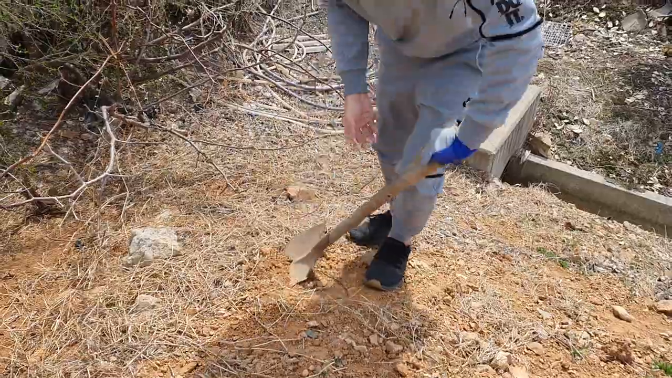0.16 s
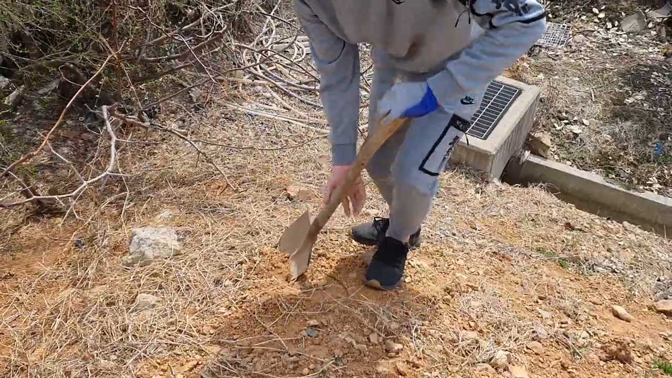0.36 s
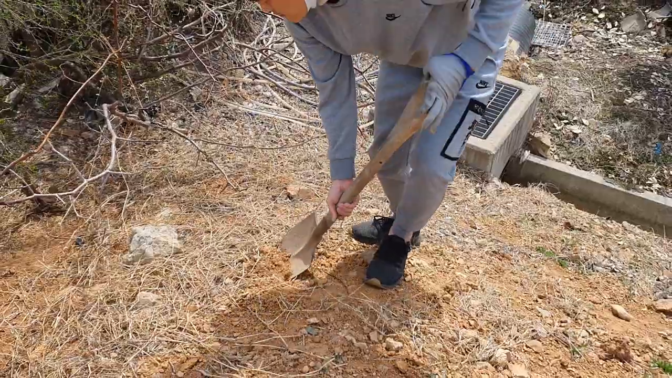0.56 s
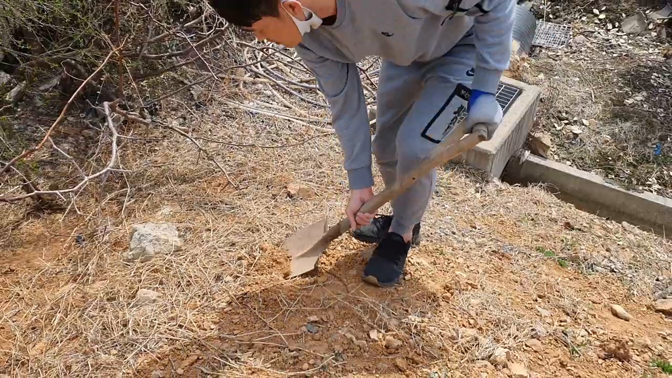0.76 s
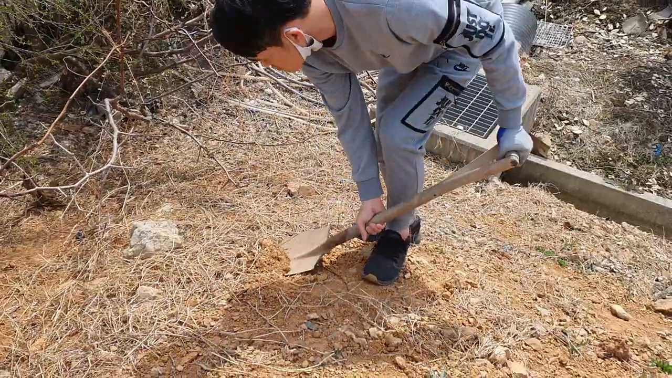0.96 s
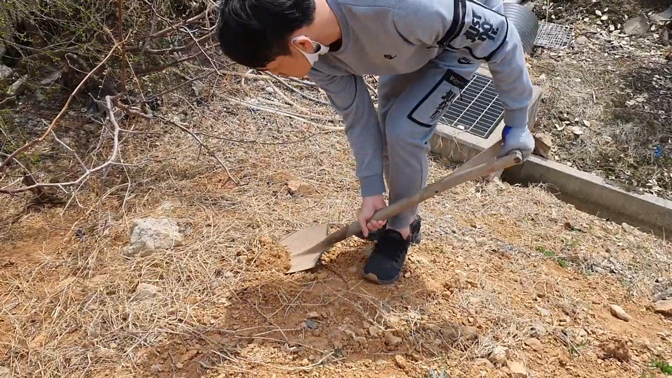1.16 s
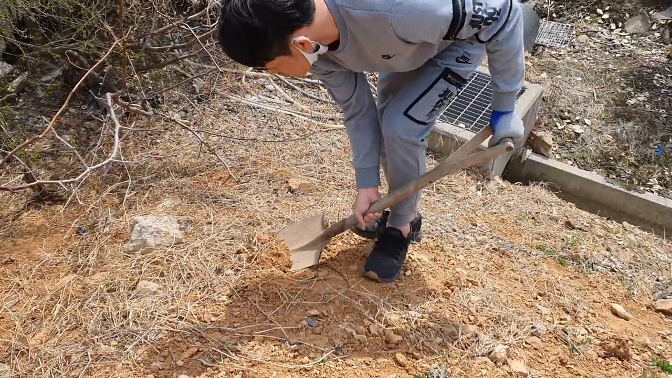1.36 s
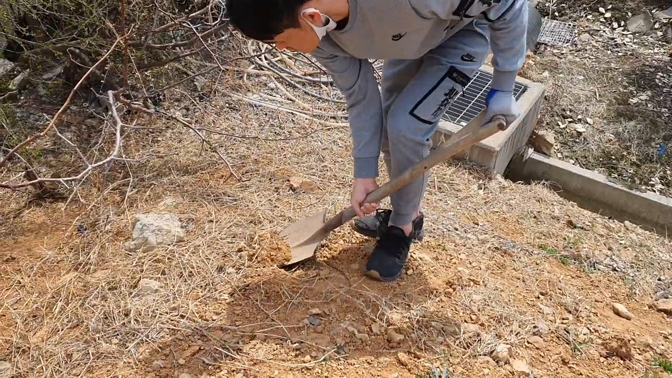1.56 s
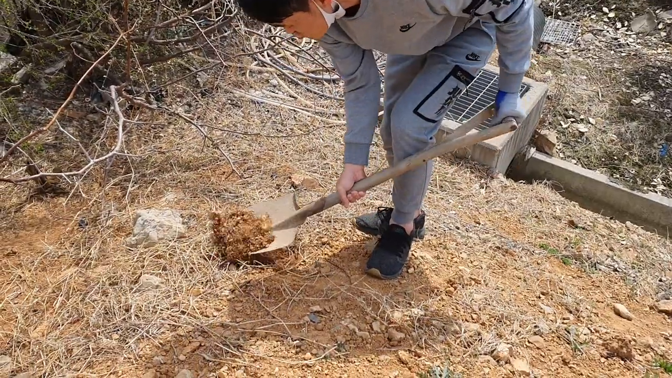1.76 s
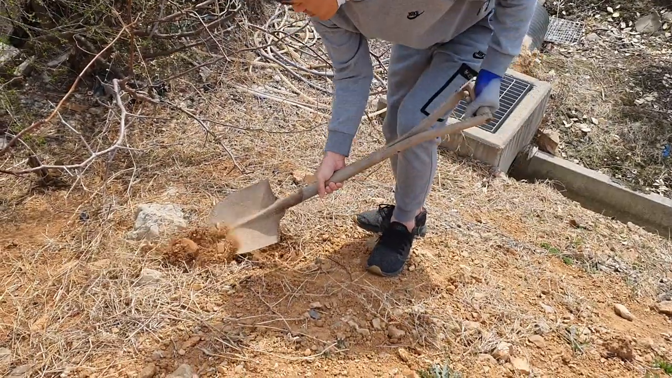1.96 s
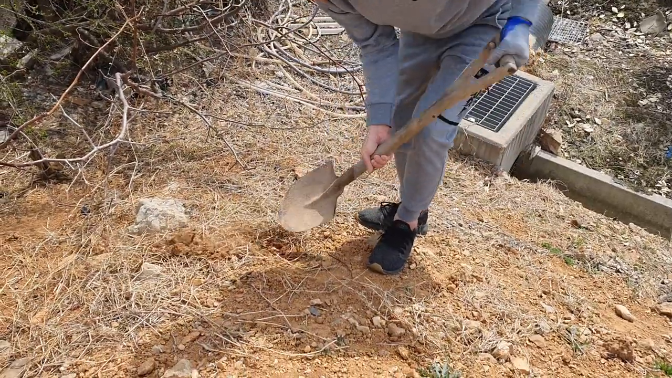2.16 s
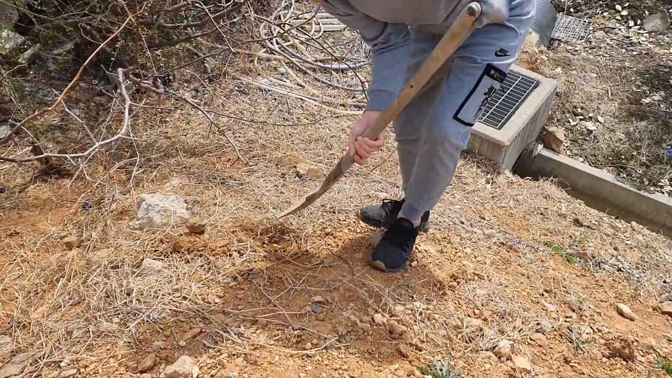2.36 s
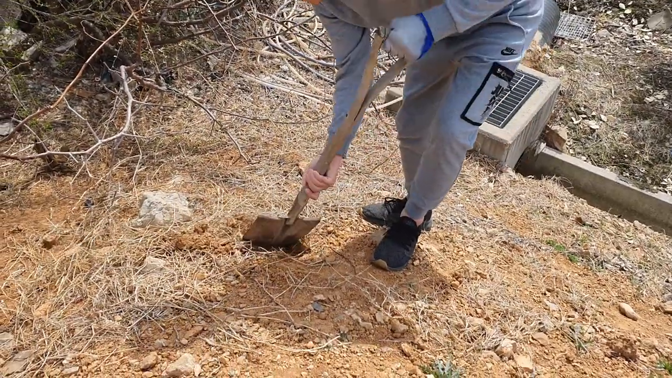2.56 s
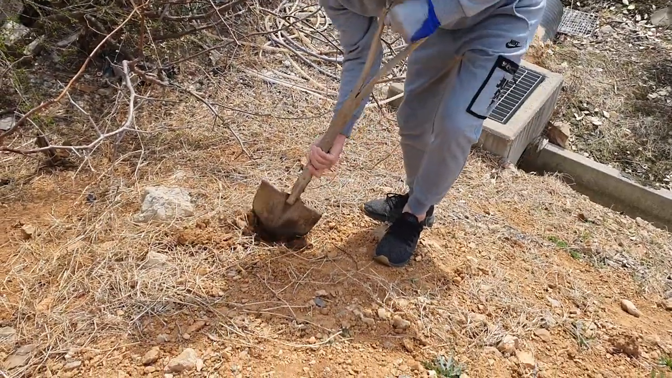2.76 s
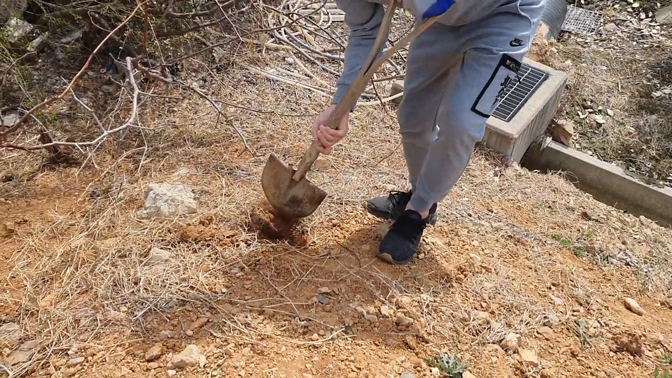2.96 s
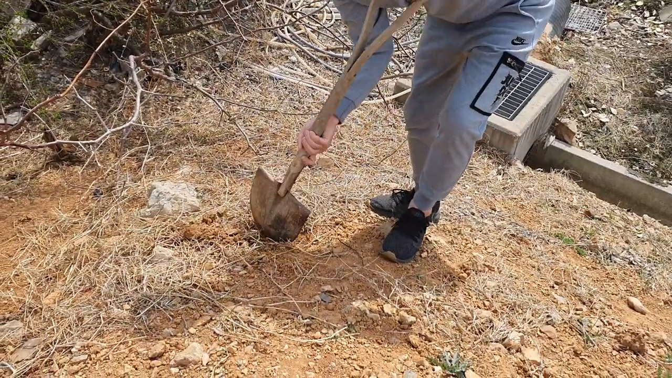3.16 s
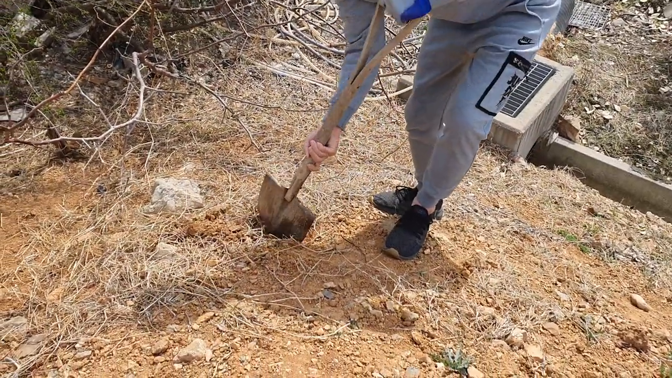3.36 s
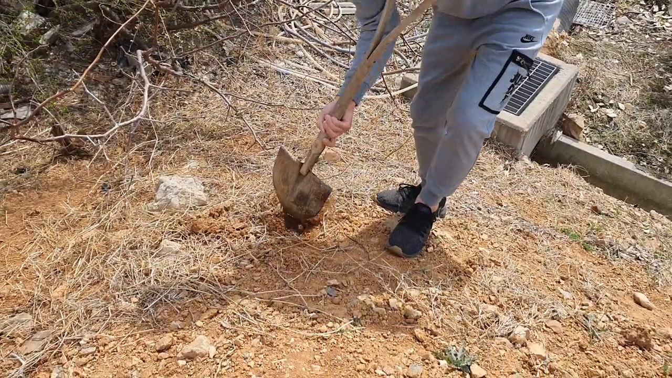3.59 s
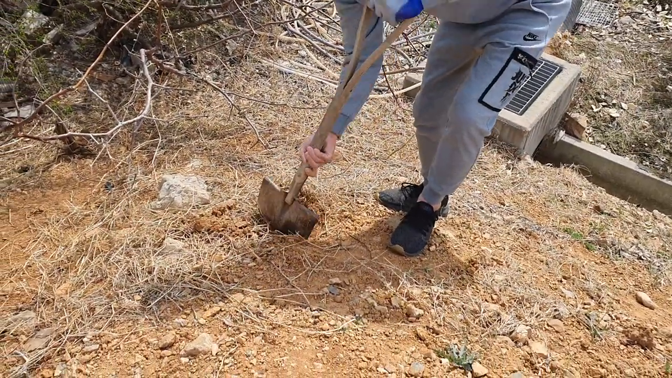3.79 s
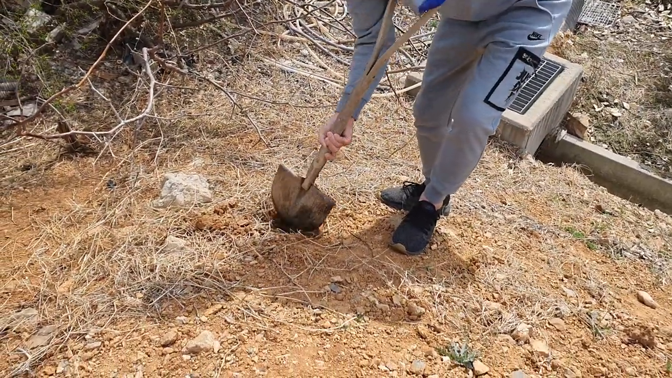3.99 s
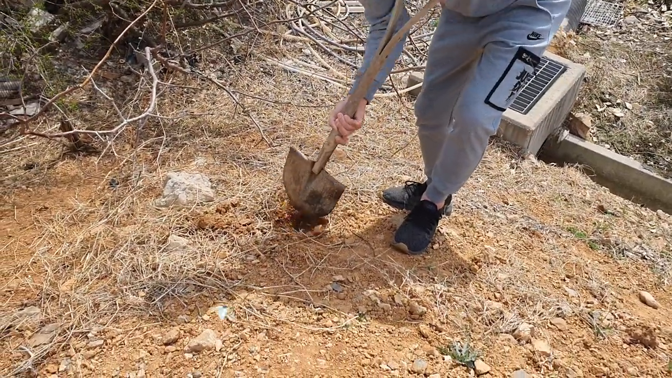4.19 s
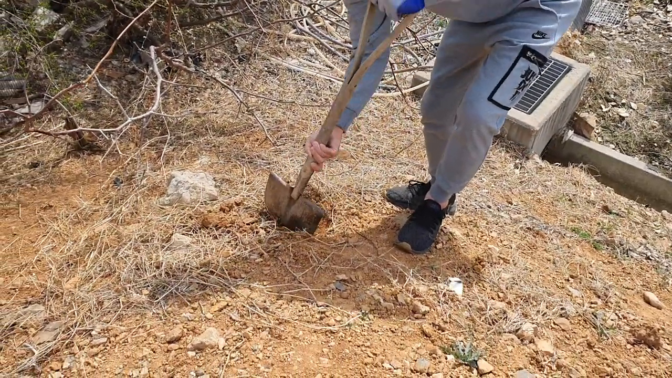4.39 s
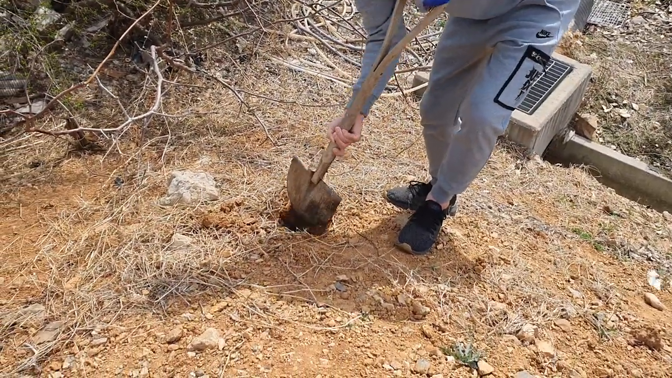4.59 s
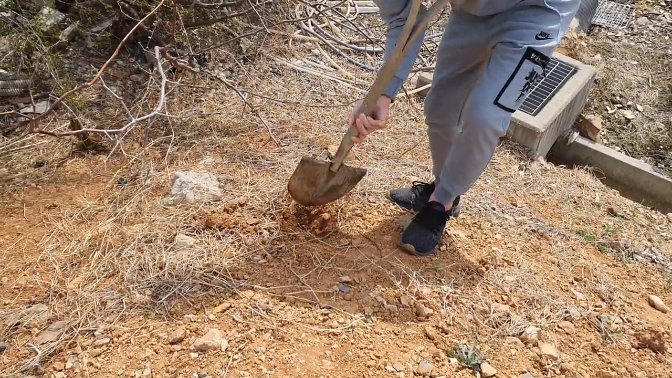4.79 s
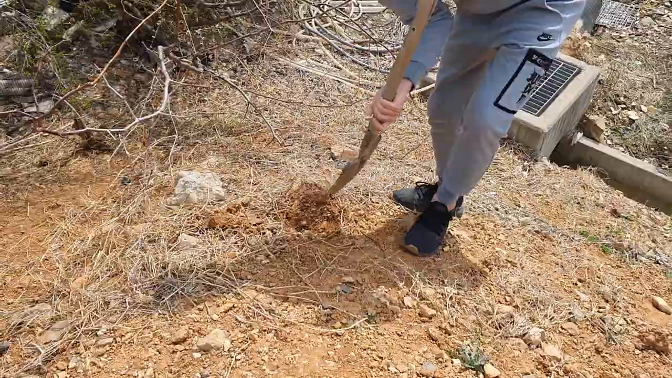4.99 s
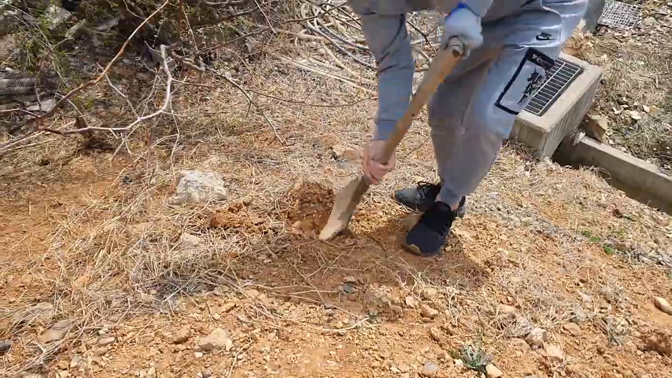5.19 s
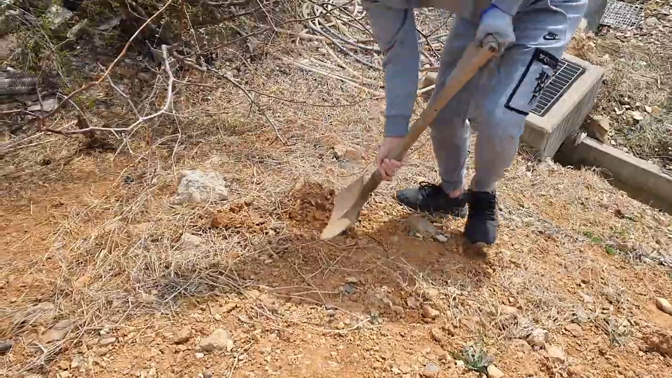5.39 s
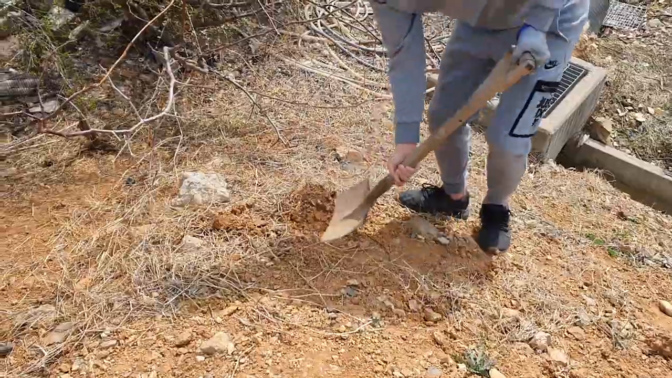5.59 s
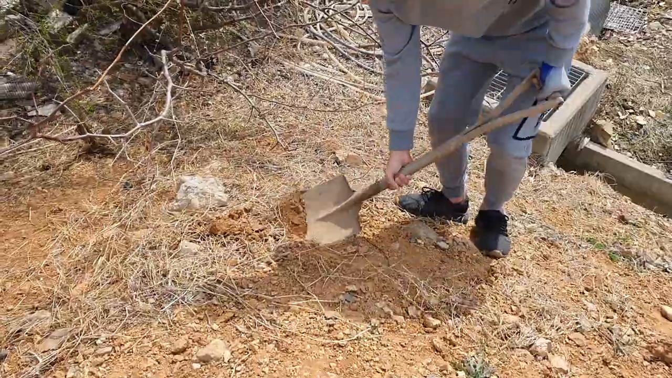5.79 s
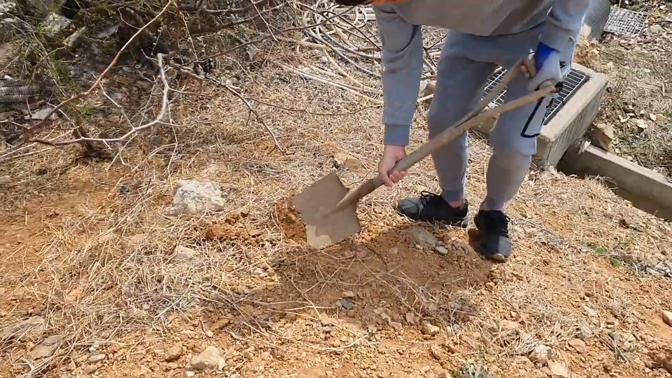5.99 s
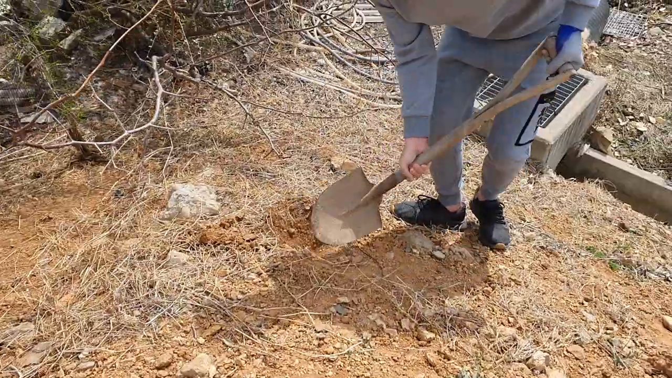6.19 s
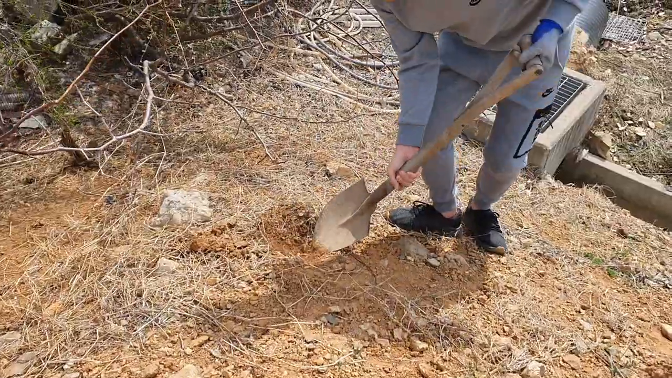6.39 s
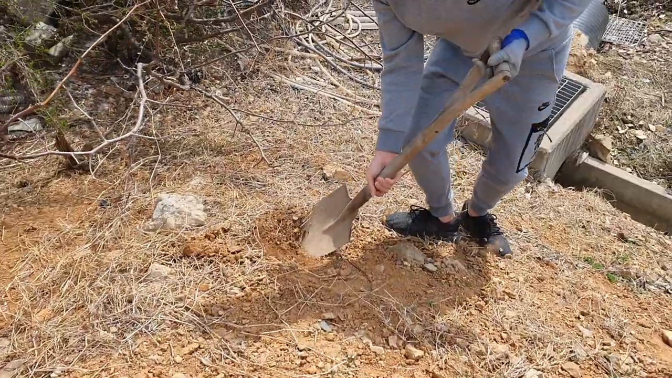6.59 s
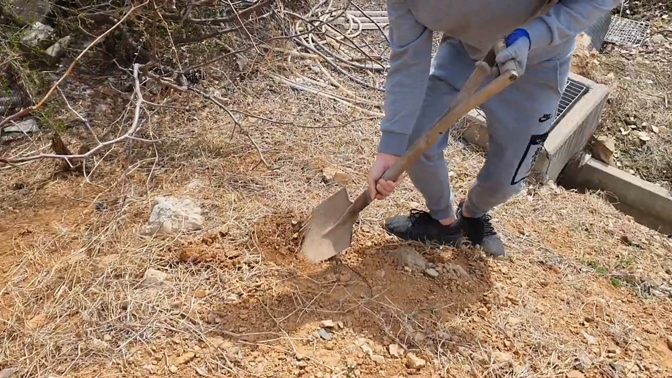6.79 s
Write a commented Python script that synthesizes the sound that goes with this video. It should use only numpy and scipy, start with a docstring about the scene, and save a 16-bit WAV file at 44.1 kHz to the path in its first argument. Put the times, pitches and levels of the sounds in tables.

```python
"""A steel spade is stabbed into dry stony soil, outdoors, a few metres from a hand-held two-port microphone.
Each bite drives grit and stones under a contact force; the blade's modes ring dully in the soil
and clearly when it clinks on a stone in the air. Grit slides, pebbles tick and the ground thumps.
Behind it a far machine hums, drifting from about 100 down to 95 Hz, over soft shaped-noise rumble and hiss."""
import sys
import numpy as np
from scipy import signal
from scipy.fft import rfft, irfft, next_fast_len
from scipy.io import wavfile

SR = 44100
rng = np.random.default_rng(int(sys.argv[2]) if len(sys.argv) > 2 else 0)


def master(y):
    """Save y as 16-bit WAV."""
    cut = np.clip(np.atleast_2d(y).T, -1, 1)
    pcm = np.round(cut * 32767)  # scale
    wavfile.write(sys.argv[1], SR, pcm.astype(np.int16))


N = 301864

# blade bites soil: (t/s, crunch force level/dB, then re crunch: thud/dB, knock/dB, treble/dB;
# push/ms, nominal t60/ms, which each band stretches or shortens)
BITES = [(0.026, -32.5, -16, -7.5, -11.5, 23, 20), (0.049, -32.5, -17, -5.5, -1.5, 2, 108),
         (0.833, -34, -13, -9, -16, 2.6, 98), (0.878, -33, -2.5, 0, -18, 7.6, 32),
         (0.9272, -41, -21, 3.5, 3.5, 10.3, 65), (1.0078, -26, -27, -12, -11, 6, 160),
         (1.03, -25, -25, -10, -10, 5.7, 160), (1.0756, -24.5, -10, -5.5, -6.5, 6, 47),
         (1.095, -31, -19, -1.5, -4, 5.8, 92), (1.1259, -24.5, -21, -5, -23, 1.8, 44),
         (1.166, -40, 2.5, -3, -2, 1.5, 29), (1.2803, -38.5, -6, -4.5, -1, 3.3, 38),
         (1.3475, -39, -9, 0, -7, 4.3, 190), (1.408, -34, -15, -8, -10, 10.2, 28),
         (1.423, -30, -30, -3, -14, 4.3, 28), (1.4874, -27, -21, -14, -12.5, 1.6, 87),
         (1.524, -12, -10.5, -3.5, -15, 5.8, 11), (1.6194, -37.5, -2, 7, -17, 2.6, 10),
         (1.6916, -34.5, -21, 6, 0, 10.3, 105), (1.8775, -24, -40, -9.5, -27, 11, 157),
         (1.957, -32.5, -12, 1, 2, 19, 190), (2, -29.5, -30, -1.5, -10, 13, 180),
         (2.616, -22, -10, 1, 7.5, 12, 113), (2.6535, -27, -12, -2, 3, 15, 180),
         (2.686, -32, -5, 2.5, 5, 23, 42), (2.802, -35.5, -22, -14, -8, 3.8, 470),
         (2.8187, -26, -26, -4, -2.5, 2.3, 72), (2.84, -19.5, -27, -17.5, -0.5, 9.9, 13),
         (2.951, -33.5, -23, -13, 1, 15, 260), (3.314, -28.5, -29, -9, 1, 23, 14.7),
         (3.339, -11.5, -19, -8.5, -2, 7.4, 75), (3.4874, -22, -19, -6.5, -10.5, 3.4, 20),
         (3.5721, -23.5, -40, -6, -7, 6.6, 37), (3.879, -25.5, -15, -9.5, -4.5, 7.2, 16),
         (3.886, -17.5, -23, -14.5, -2.5, 16, 98), (3.9012, -12.5, -4.5, -17, -7.5, 6.5, 16),
         (4.0665, -14.5, -16, -5.5, -20, 1.4, 22), (4.08, -17.5, -12, -4, -13, 6.4, 40),
         (4.105, -25.5, -11, -10.5, -2, 13, 12), (4.1219, -14, -21, -4, -5, 9.2, 49),
         (4.17, -34, -17, -10.5, -14, 5.4, 73), (4.2151, -27, -40, -26, 0, 5.6, 72),
         (4.2307, -29.5, -40, -10.5, -8, 4.3, 187), (4.456, -30, -13, -24, -5, 30, 13),
         (4.481, -13.5, -6, -10.5, -3, 12.6, 27), (4.675, -30, -6, -12, -4, 17, 140),
         (4.706, -27.5, -9, -17, -7, 3.6, 58), (4.7208, -33.5, -18, -7, -3.5, 9.9, 83),
         (4.7933, -24, -26, -26, -8.5, 8.6, 36), (4.8941, -21, -50, -32, -1.5, 3.6, 44),
         (5.2635, -17.5, -24.5, -6.5, -7.5, 16, 16), (5.2784, -19, -10.5, -3.5, -0.5, 8.8, 120),
         (5.3433, -31.5, -30, -11, 3, 1.2, 67), (5.515, -41, -4, -18, -16, 2.5, 36),
         (5.659, -39.5, -17, -14.5, -6, 3.7, 9), (5.928, -29.5, -25, -15, -10, 11.4, 75),
         (5.965, -40, -2.5, 2, -14, 12.6, 37), (6.1608, -37, -25, -31, -4, 3.4, 130),
         (6.3216, -35.5, -20, -7, -1.5, 3.1, 265), (6.401, -32, -26, -19, -15, 4.2, 96),
         (6.4938, -34.5, -13.5, -5, -14, 4.4, 230), (6.5175, -36.5, -34, -4, -8.5, 26, 810),
         (6.552, -41, -14, 9, -5, 13, 75), (6.6464, -25, -25, -13.5, -3.5, 3.9, 66)]
# grit slides on the blade or showers off it:
# (start t/s, hold/s, crunch level/dB before clumping, treble level/dB re crunch)
SLIDES = [(0, 0.023, -34, -7), (.12, .04, -47.5, -6), (0.242, 0.018, -39, -1.5),
          (0.428, 0.041, -42.5, -3.5), (0.62, 0.12, -54, -6), (0.881, 0.21, -42, -3),
          (1.35, 0.052, -40.5, -6.5), (1.79, 0.13, -43.5, 0.5), (2.027, .11, -45, 7),
          (2.225, 0.89, -66.5, 17), (2.726, 0.32, -47, 1), (3.151, 0.18, -74.5, 17),
          (3.542, 0.1, -44, -1.5), (3.72, 0.17, -62, 11.5), (3.957, 0.043, -41, -12),
          (4.527, 0.016, -46, -15), (4.763, 0.16, -53, -2), (5.482, 0.018, -48, -2.5),
          (5.775, 0.029, -41.5, -7), (5.884, 0.065, -34.5, -4.5), (6.118, 0.087, -43.5, -22),
          (6.4, .08, -43, -11), (6.566, 0.05, -29, -4.5)]
SLIDE_RISE_DB_PER_S, SLIDE_FALL_DB_PER_S = 176, 186.5
FIRST_TOUCH = 0.54   # share of the full force at first contact; the push brings the rest
# loosened grit runs on after every bite: level re crunch before clumping, decay, treble re trickle
TRICKLE_DB, TRICKLE_T60_MS, TRICKLE_TREBLE_DB = -18.5, 390, -2


def sliding_power():
    """Power of loose grit, crunch and treble: each slide rises, holds and falls at a fixed rate in dB."""
    t = np.arange(0, N / SR + .01, .002)
    power = 0
    for s, hold_s, crunch_db, treble_db in SLIDES:
        rise_db = SLIDE_RISE_DB_PER_S * np.maximum(s - t, 0)
        fall_db = SLIDE_FALL_DB_PER_S * np.maximum(t - s - hold_s, 0)
        power = power + from_db(2 * (crunch_db - rise_db - fall_db)) * from_db([[0], [2 * treble_db]])
    return np.array([np.interp(np.arange(N) / SR, t, band) for band in power])


def contact():
    """Rms force of thud, knock, crunch and treble: sliding in clumps plus sudden bites, each leaving a trickle."""
    loose, bites = sliding_power(), np.zeros((4, N))
    ms = 1000 * np.arange(SR // 4) / SR
    trickle = from_db(2 * (TRICKLE_DB - 60 * ms / TRICKLE_T60_MS)) * from_db([[0], [2 * TRICKLE_TREBLE_DB]])
    for s, crunch_db, thud_db, knock_db, treble_db, push_ms, t60_ms in BITES:
        i = round(s * SR)
        loose[:, i:i + len(ms)] += from_db(2 * crunch_db) * trickle[:, :N - i]
        # the soil thud starts later and outlasts the crack; the treble dies first
        bands = [(thud_db, 4.0, 1.4), (knock_db, .8, 1.1), (0, 0, 1), (treble_db, 0, .8)]
        for band, (rel_db, late_ms, longer) in enumerate(bands):
            onset = np.clip(ms / (late_ms + 1.05), 0, 1)
            push = np.clip(FIRST_TOUCH + ms / (push_ms + 1), 0, 1)
            fall_db = -60 * np.maximum(ms - late_ms - push_ms, 0) / (t60_ms * longer)
            force = onset * push * from_db(crunch_db + rel_db + fall_db)
            bites[band, i:i + len(ms)] += force[:N - i] ** 2
    slip_starts = (rng.random(N) < 90 / SR) * rng.exponential(1.6, N)
    slips_db = signal.lfilter([1], [1, -.995], slip_starts)   # brief slips
    clumps_db = -6.0 + 1.56 * drift(18.2) + np.minimum(slips_db, 9)
    # sliding keeps thud and knock low
    sliding = loose[[0, 0, 0, 1]] * from_db(2 * clumps_db) * from_db([[-22], [-17], [0], [0]])
    crushing_db = 2.5 * drift(110)   # stones give way in uneven clusters
    return np.sqrt(sliding + bites) * from_db(crushing_db)


# what the contact sets off, from thud to treble; no blade mode lies in the thud:
# (low f/Hz, high f/Hz, stones per s, cycles a stone rings, grit level/dB, stones level/dB, blade level/dB)
LAYERS = [(60, 900, 250, 18, -4, -3, 0), (900, 2350, 300, 35, -7, -3, -7),
          (2350, 5000, 500, 40, -6, -4, -6), (5000, 16500, 900, 45, -2, -6, -9)]
# modes of the steel blade, also heard in the clinks:
# (f/Hz, relative level/dB, t60/s in air before the damping of each contact)
BLADE = [(1066, -22, 0.43), (1529, -23, 0.48), (1615, -22, 0.63), (1685, -23, 0.26), (1798, -16, 0.18),
         (1906, -13, 0.35), (2218, -14, 0.12), (2654, -13, 0.16), (2778, -5, 0.26), (2972, -28, 0.32),
         (3128, -12, 0.3), (3311, 0, 0.2), (3655, -15, 0.22), (3833, -21, 0.16), (4420, -27, 0.19),
         (4780, -13, 0.1), (5012, -31, 0.27), (5502, -18, 0.13), (5798, -28, 0.25), (6137, -20, 0.22),
         (6352, -30, 0.25), (6525, -12, 0.16), (6912, -25, 0.19), (7337, -19, 0.18)]
# colour of crushed grit, also of the pebbles: (f/Hz, relative spectrum level/dB)
CRUNCH = [(29, -48.5), (50, -61), (337, -16.5), (545, -30), (711, -11), (1070, -18), (1660, -1), (2160, -7),
          (3100, -1.5), (4670, -6), (5020, -9.5), (6870, -7.5), (8750, -15.5), (13800, -8), (16000, -14.5)]


def soil_damped_blade(x, modes):
    """Soil damps each blade mode quickly; a faint longer ring always lies under it."""
    out = 0
    for k, (hz, db, t60) in enumerate(modes):
        rung = ring(x, hz, 0.077 * t60) + 0.11 * ring(x, hz, 0.66 * t60)
        out = out + from_db(0.94 * db) * rung * (-1) ** k
    return out


def digging():
    """Grit and stones under the contact force, heard directly and through the soil-damped blade."""
    grains, out = grit(6000, spread_db=3.0, dust=0.063), 0
    # grains nearer one port
    stray = shaped([grit(6000, 4.2, 0.54), grit(6000, 3.3, 0.37)], lambda hz: 3.9 * hz / (hz + 500))
    for force, layer in zip(contact(), LAYERS):
        low, high, per_s, cycles, grit_db, stones_db, blade_db = layer

        def colour(hz):
            return from_db(at_hz(CRUNCH, hz)) / np.sqrt(1 + (low / (hz + 1)) ** 8 + (hz / high) ** 8)

        out = out + force * from_db(grit_db) * rms_one(shaped(grains + stray, colour))
        out = out + force * from_db(stones_db) * pebbles(per_s, max(low, 240), min(high, 8500), cycles)
        modes = [mode for mode in BLADE if low < mode[0] < high]
        if modes:
            steady_rms = np.sqrt(np.mean(soil_damped_blade(grains, modes) ** 2))
            out = out + from_db(blade_db) * soil_damped_blade(force * grains, modes) / steady_rms
    return out


def grit(per_s, spread_db, dust):
    """Grains snapping at random, sizes heavy-tailed, over fine dust; rms 1."""
    sizes = from_db(spread_db * np.minimum(rng.exponential(1, N), 4)) * rng.choice([-1, 1], N)
    return rms_one(sizes * (rng.random(N) < per_s / SR) + dust * rng.standard_normal(N))


def pebbles(per_s, low_hz, high_hz, cycles):
    """Stones knock at random; each rings a few cycles at a pitch drawn from 14 classes; rms 1."""
    hits = grit(per_s, spread_db=6.0, dust=0)
    pitch_class = rng.integers(0, 14, N)
    out = 0
    for k, hz in enumerate(np.geomspace(low_hz, high_hz, 14)):
        out = out + from_db(at_hz(CRUNCH, hz)) * ring(hits * (pitch_class == k), hz, cycles / hz)
    return rms_one(out)


# free blade on stone: (t/s, level/dB at the first favoured pitch, first favoured f/Hz, spread/octaves,
# second favoured f/Hz, its level/dB, factor on the blade's t60)
CLINKS = [(1.886, 3, 1543, 0.062, 3100, -8, 0.37), (1.963, -7, 1500, 0.048, 3125, -23, 0.78),
          (2.043, -28, 1615, 0.073, 2780, -34.5, 1.45), (2.08, -19.5, 3130, 0.046, 4280, -8, 1.2),
          (4.133, -17.5, 1664, .03, 3128, -40, 2.7), (4.232, -21, 2780, 0.046, 1710, -37, 0.51),
          (4.542, -32, 2760, .06, 1700, -39, 0.71), (4.798, -16.5, 3087, .04, 1640, -26.5, 1.24),
          (4.897, -24.5, 3000, 1.46, 1390, -31.5, 1.14), (6.166, -38, 3140, .072, 1615, -50, 2.4),
          (6.324, -29, 3160, 0.095, 1615, -50, .8)]


def clinks():
    """Each stone favours the modes near two pitches; every mode radiates towards the ports in its own phase."""
    out, chance_db = np.zeros((2, N)), rng.normal(0, 1.8, (len(CLINKS), len(BLADE)))
    t = np.arange(SR // 2) / SR
    hz, mode_db, t60 = np.transpose(BLADE)[:, :, None]
    wide = rng.uniform(-0.6, 1.0, hz.shape)
    for (s, level_db, first_hz, spread, second_hz, second_db, damping), own_db in zip(CLINKS, chance_db):
        favour = 0
        for db, near_hz in [(level_db, first_hz), (second_db, second_hz)]:
            favour = favour + from_db(db - 7.4 * (np.log2(hz / near_hz) / spread) ** 2)
        modes = favour * from_db(mode_db + own_db[:, None] - 60 * t / (t60 * damping))
        modes *= 1 - np.exp(-t / 0.0023)   # the contact lasts a moment
        mid = (modes * np.sin(2 * np.pi * hz * t)).sum(axis=0)
        side = (wide * modes * np.cos(2 * np.pi * hz * t)).sum(axis=0)
        i = round(s * SR)
        out[:, i:i + len(t)] += (mid * from_db([[-2.5], [2.5]]) + side * [[1], [-1]])[:, :N - i]
    return out


# single pebbles dropping or snapping: (t/s, level/dB before a 13.5 dB cut, pitch f/Hz)
TICKS = [(0.231, -30, 3320), (0.255, -47, 3370), (0.454, -46, 3330), (0.523, -32, 3300),
         (1.656, -32.5, 3950), (1.808, -35, 3300), (1.843, -19.5, 1990), (3.597, -43, 3070),
         (3.637, -27.5, 1555), (4.032, -31.5, 2900), (4.275, -23.5, 3030), (4.392, -34.5, 860),
         (4.55, -47.5, 2740), (5.759, -52, 3017), (5.793, -31, 3120), (5.867, -28, 3760),
         (5.979, -33, 3500), (6.75, -43, 3750)]
# the ground booms under five of the stabs: (t/s, starting level/dB)
THUMPS = [(3.356, -38.5), (3.903, -37), (4.119, -48), (4.486, -32.5), (5.282, -47)]


def knocks():
    """Pebble ticks are a snap and a short ring; thumps a low swing of the ground, sinking from 75 Hz."""
    out, t = np.zeros(N), np.arange(SR // 5) / SR
    for (s, level_db, hz), snap in zip(TICKS, rng.standard_normal((len(TICKS), len(t)))):
        i = round(s * SR)
        tick = np.sin(2 * np.pi * hz * t) * from_db(-60 * t / 0.067) + 0.87 * snap * from_db(-60 * t / 0.049)
        out[i:i + len(t)] += (from_db(level_db - 13.5) * tick)[:N - i]
    for s, level_db in THUMPS:
        i = round(s * SR)
        thump = from_db(level_db - 60 * t / 0.34) * np.sin(2 * np.pi * 75 * t / (1 + 1.6 * t))
        out[i:i + len(t)] += thump[:N - i]
    return out


# microphone phase: (f/Hz, left lead/radians)
PORT_PHASE = [(0, 0), (1300, .4), (2300, 5.2), (4200, 7), (8100, 13), (9100, 25), (16200, 25)]
# microphone colour: (f/Hz, left-right level/dB)
PORT_BALANCE = [(200, 1), (700, 1), (1300, 10.5), (2400, 3), (4400, -7), (8000, -2), (15000, -3)]
# ground, legs and drain wall: (delay t/s at the left port, level/dB in the bass)
ECHOES = [(.0011, -49.5), (.0034, -15), (.009, -9), (.023, -16.5)]


def ports(x):
    """The two ports sit apart: own phase, colour and echo delays on each side."""
    def echoes(hz, far):
        out = 1
        for s, db in ECHOES:
            out = out + from_db(db) / (1 + hz / 6000) * np.exp(-2j * np.pi * hz * s * far)
        return out

    def response(hz):
        half_phase = np.exp(.5j * np.interp(hz, *np.transpose(PORT_PHASE)))
        half = from_db(at_hz(PORT_BALANCE, hz) / 2) * half_phase
        return np.array([half * echoes(hz, 1), echoes(hz, 1.17) / half])   # right echoes come later
    return shaped(x, response)


# far machine and open air: (t/s, hum level/dB rms, second partial level/dB rms, air level/dB);
# hum and partial waver about these, and the air is lifted 0.5 dB and wavers
FAR = [(0, -50.5, -59, -56.5), (.4, -51.5, -72.5, -50), (.75, -49.5, -58.5, -56.5),
       (1.4, -51.5, -57, -55.5), (2.05, -48, -55.5, -53.5), (2.6, -46.5, -53, -54.5), (3.1, -52, -62, -58),
       (3.75, -61, -64.5, -58.5), (4.5, -71, -68, -55), (5.05, -61, -68, -59), (5.4, -63.5, -64, -57),
       (5.9, -52, -57.5, -53), (6.45, -62.5, -62.5, -53.5), (6.65, -56, -67, -57), (6.76, -44, -60, -54.5),
       (6.84, -43, -53, -51)]
# the machine slows a little: (t/s, f/Hz)
HUM_PITCH = [(0, 99.5), (.4, 99.8), (.75, 98.34), (5, 96.7), (5.5, 95.3), (6.84, 95.2)]
# further hum partials: (multiple of the hum pitch, level/dB re hum before their own waver)
HUM_PARTIALS = [(0.502, -26.5), (0.75, -15.5), (1.449, -13.5), (4.05, -20.5)]


def machine_hum():
    """Sine partials follow one gliding pitch; each wavers in level."""
    (hum_db, second_db, _), (hum_hz,) = in_time(FAR), in_time(HUM_PITCH)
    turn = 2 * np.pi * np.cumsum(hum_hz) / SR
    hum = from_db(hum_db + 2.36 * drift(9.6)) * np.sin(turn)
    hum += from_db(second_db + 1.7 * drift(2.5)) * np.sin(2 * turn)
    for multiple, db in HUM_PARTIALS:
        waver_db, phase_slip = 3 * drift(3), .6 * drift(3)
        hum += from_db(hum_db + db + waver_db) * np.sin(multiple * turn + phase_slip)
    return np.sqrt(2) * hum   # rms level to sine height


# colour of the air noise: (f/Hz, relative spectrum level/dB)
AIR = [(12, -100), (20, -68), (43, -1), (101, -9.5), (146, -7), (204, -19), (241, -11.5), (849, -16.5),
       (1120, -21.5), (1260, -13.5), (1760, -25), (7110, -22.5), (9400, -36), (13500, -29), (16000, -47.5)]
# how alike the air noise is at both ports: (f/Hz, likeness from 0 to 1)
AIR_LIKENESS = [(25, .65), (60, 0), (180, 0.98), (550, 0), (1650, 0.12), (15000, 0)]


def air_noise():
    """Patchy rumble and hiss: coloured noise, split into mid and side by its likeness at the ports."""
    air_db = in_time(FAR)[2]
    mid, side = rng.standard_normal((2, N))

    def alike(hz):
        return np.clip(at_hz(AIR_LIKENESS, hz), -1, 1)

    mid = shaped(mid, lambda hz: from_db(at_hz(AIR, hz)) * np.sqrt(1 + alike(hz)))
    side = shaped(side, lambda hz: from_db(at_hz(AIR, hz)) * np.sqrt(1 - alike(hz)))
    return rms_one(mid + side * [[1], [-1]]) * from_db(air_db + 0.5 + 0.36 * drift(1.9))


def from_db(db):
    """dB to gain."""
    return 10 ** (np.asarray(db) / 20)


def rms_one(x):
    """Scale to rms 1."""
    return x / np.sqrt(np.mean(x ** 2) + 1e-20)


def in_time(rows):
    """Columns of a curve table at every sample."""
    s, *columns = np.transpose(rows)
    return [np.interp(np.arange(N) / SR, s, c) for c in columns]


def at_hz(points, hz):
    """Read a spectrum table on a log axis."""
    table_hz, values = np.transpose(points)
    return np.interp(np.log(hz + 1), np.log(table_hz + 1), values)


def shaped(x, response):
    """Filter by a function of Hz."""
    size = next_fast_len(N + 4096)
    hz = np.arange(size // 2 + 1) * SR / size
    return irfft(rfft(x, size) * response(hz), size)[..., :N]


def drift(rate):
    """Slow random wander of rms 1, smoothed above the rate in Hz."""
    r = np.exp(-80 * np.pi * rate / SR)   # one step every 40 samples
    slow = signal.lfilter([1], [1, -2 * r, r * r], rng.standard_normal(N // 40 + 2002))[2000:]
    return np.interp(np.arange(N) / 40, np.arange(len(slow)), rms_one(slow))


def ring(clicks, hz, t60):
    """A unit click sets a sine of height 1 ringing."""
    r, w = from_db(-60 / (t60 * SR)), 2 * np.pi * hz / SR
    return signal.lfilter([0, np.sin(w)], [1, -2 * r * np.cos(w), r * r], clicks + 1e-18)


# where the spade stands before the microphone: (t/s, left-right level/dB)
BEARING = [(0, 0), (4.9, -1.5), (6.3, -4.5), (6.84, -4)]


def scene():
    """The spade before the ports, the surroundings around them."""
    bearing_db, = in_time(BEARING)
    spade = ports(digging() + knocks()) + clinks()
    return spade * from_db([bearing_db / 2, -bearing_db / 2]) + machine_hum() + air_noise()


CUTOFF_HZ = 16300   # from here up the treble is at least 80 dB down


def record(dry):
    """The microphone drops the deepest bass, peaks beyond full scale are clipped, the top is cut."""
    heard = signal.sosfilt(signal.butter(2, 35, "high", fs=SR, output="sos"), dry)
    top_cut = signal.cheby2(20, 80, CUTOFF_HZ, fs=SR, output="sos")
    return signal.sosfilt(top_cut, np.clip(heard, -1, 1))


dry = scene()
out = record(dry)
master(out)
```